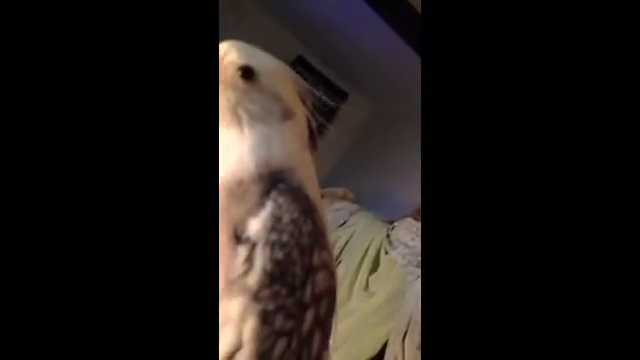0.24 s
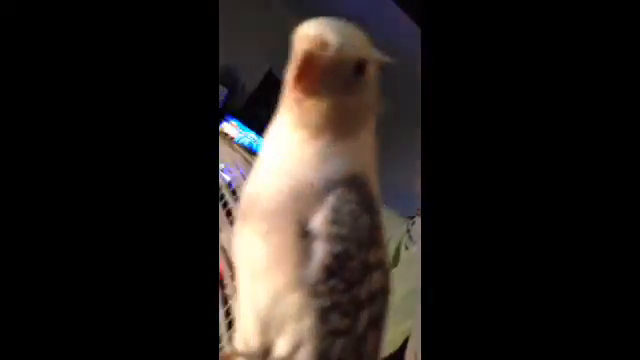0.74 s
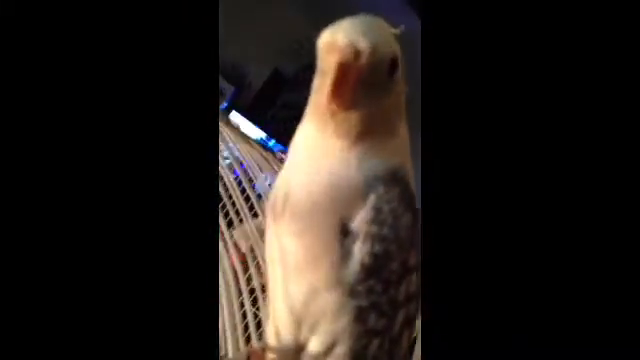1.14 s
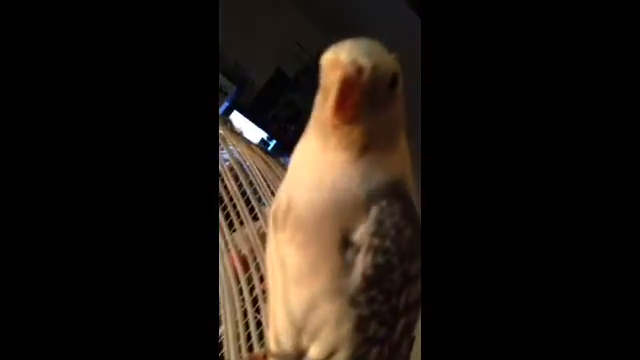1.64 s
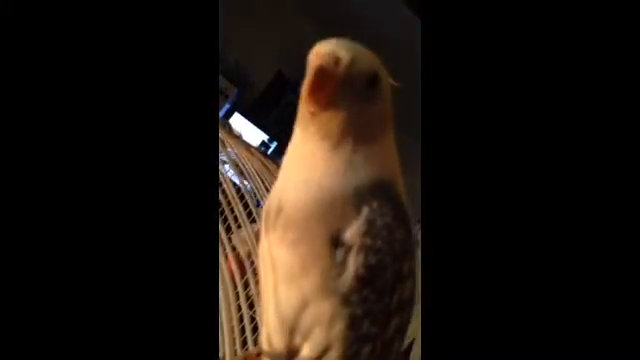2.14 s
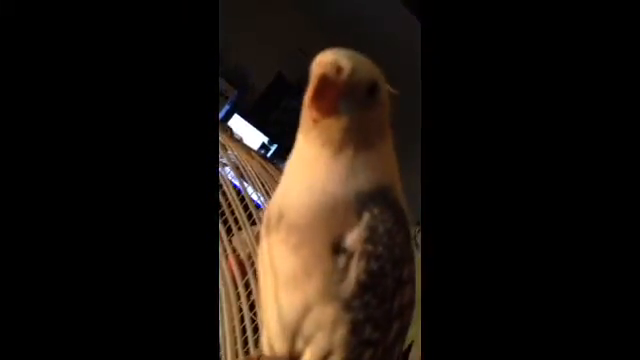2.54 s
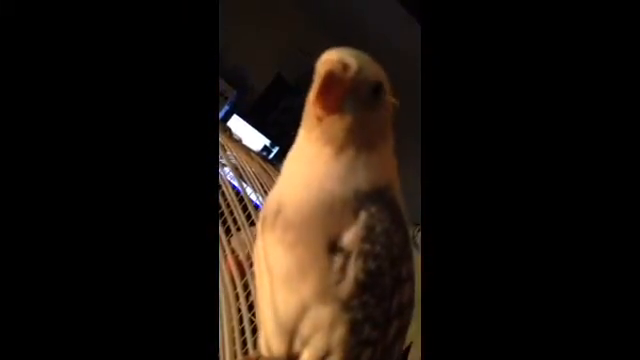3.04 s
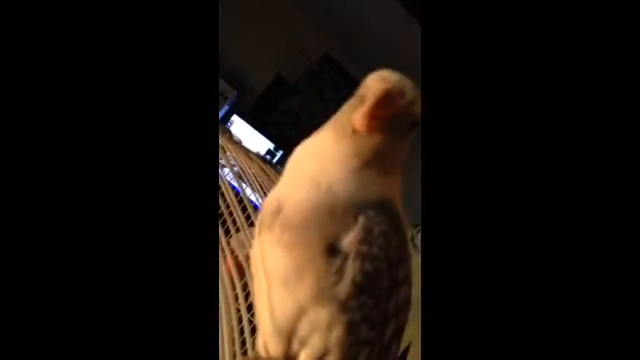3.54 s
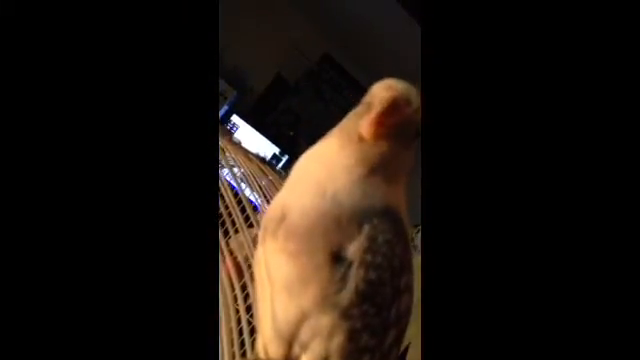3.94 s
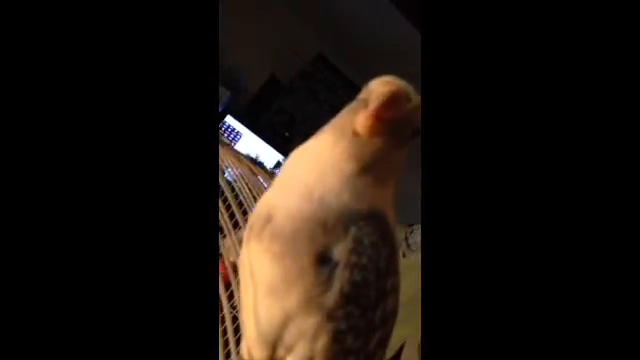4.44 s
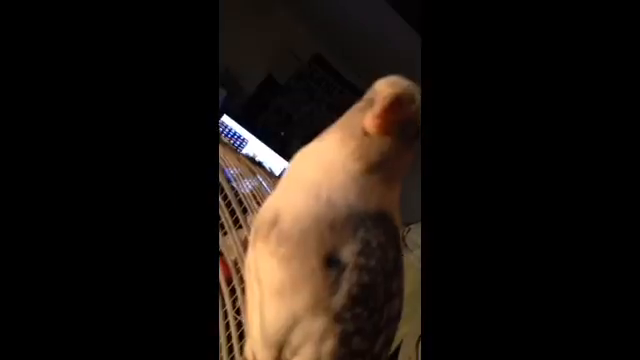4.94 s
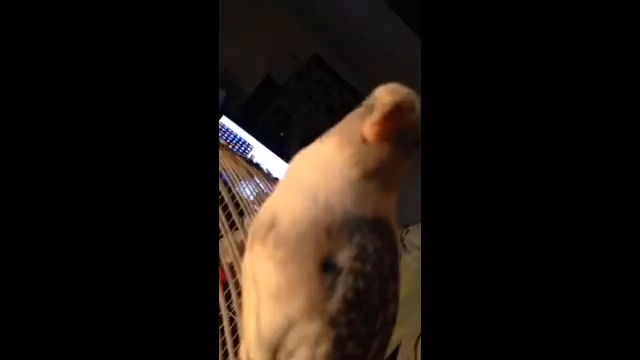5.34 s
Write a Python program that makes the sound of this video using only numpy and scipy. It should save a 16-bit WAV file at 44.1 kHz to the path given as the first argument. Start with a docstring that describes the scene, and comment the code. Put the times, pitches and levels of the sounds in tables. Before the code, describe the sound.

A cockatiel very close to the microphone in a small quiet room. One chirp opens the scene, then about a second of mostly faint, distant chirps. From 1.2 seconds it chatters rapidly, about six short, scratchy-edged chirps a second, until 3.6. After a fainter gap, a held call swells into a shrill quaver, and the chirping resumes to the end.

```python
"""A cockatiel chatters close by in a small quiet room, in bouts of about six chirps a second. Each chirp is a
harmonic series, frequency-modulated by a fast warble that dies away; most open with a falling rasp, a harmonic
series with irregular phase and strength. One call is drawn out to a quaver. Faint chirps, as of a second bird
farther off, reach the ear mostly as reverberation; at the very start the room still rings faintly after an
earlier call, and it rings on briefly after the chirp that ends at 1.45 s. Shaped random noise is the hush of
the room."""
import sys
import numpy as np
from scipy import signal
from scipy.fft import rfft, irfft
from scipy.io import wavfile

SR = 44100
rng = np.random.default_rng(int(sys.argv[2]) if len(sys.argv) > 2 else 0)


def wrap_up_sound(samples):
    """Save the sound to the file named by the first command line argument, as 16-bit audio."""
    columns = np.atleast_2d(samples).T
    # keep every value between -1 and 1, then stretch to whole-number steps
    tamed = np.clip(columns, -1, 1)
    steps = np.round(tamed * 32767).astype(np.int16)
    wavfile.write(sys.argv[1], SR, steps)


N = 245637  # length in samples


def gain_of(db):
    """Decibel law: 20 dB is a factor of ten in amplitude."""
    return 10 ** (np.asarray(db) / 20)


def evened(x):
    """Normalisation: scales to rms 1."""
    return x / np.sqrt(np.mean(x ** 2) + 1e-20)


def read(points, hz):
    """Interpolation of a table on a logarithmic frequency axis."""
    f, value = np.transpose(points)
    return np.interp(np.log(hz + 1), np.log(f + 1), value)


def add(mix, s, sound):
    """Superposition: pressures add, here from time s onwards."""
    part = mix[max(round(s * SR), 0):][:len(sound)]
    part += sound[:len(part)]


def noise(spectrum):
    """Spectral shaping: steady random noise of the given colour, rms 1."""
    white = rfft(rng.standard_normal(N))
    colour = gain_of(read(spectrum, np.fft.rfftfreq(N, 1 / SR)))
    return evened(irfft(white * colour, N))


def flutter(top_hz):
    """Band-limited random motion: little of it is faster than top_hz, rms 1."""
    lowpass = signal.butter(3, top_hz, fs=SR, output="sos")
    return evened(signal.sosfilt(lowpass, rng.standard_normal(N)))


def span(start, end):
    """Sampling: the sample times of one call."""
    first = max(round(start * SR), 0)
    last = min(round(end * SR), N)
    return np.arange(first, last) / SR


def arc(t, *values):
    """Polynomial contour: a line through two values or a parabola through three, evenly spread."""
    knots = np.linspace(0, 1, len(values))
    curve = np.polyfit(knots, values, len(values) - 1)
    return np.polyval(curve, np.linspace(0, 1, len(t)))


def gate(t, attack, release):
    """Onset and decay transients: the syrinx starts and stops within milliseconds."""
    nearest_end = np.minimum((t - t[0]) / attack, (t[-1] - t) / release)
    return np.sin(np.pi / 2 * np.clip(nearest_end, 0, 1)) ** 2


# spectral shape of the quiet room: f/Hz, relative level per Hz/dB
ROOM_HUSH = [(15, -2), (35, -10.5), (60, -2.5), (95, 3), (140, -7), (300, -4.5), (500, -7), (1000, -22.5),
             (2500, -11.5), (5000, -18.5), (9000, -21.5), (15000, -22)]
HUSH_DB = -62.5  # rms level


def hush():
    """Stationary noise: the steady background of the quiet room."""
    return gain_of(HUSH_DB) * noise(ROOM_HUSH)


# reverberation time of the room: f/Hz, t60/s
REVERB_TIME = [(500, 0.21), (1600, 0.51), (3200, 0.21), (6000, 0.2), (14000, 0.11)]


def room(x, treble_db):
    """Reverberation: sparse reflections of random sign; soft furnishings swallow the treble first."""
    count = 1200
    arrival = 150 + 20 * np.arange(count) + rng.integers(0, 20, count)
    taps = np.zeros(SR)
    taps[arrival] = rng.choice([-1., 1.], count)
    hz, t, bands = signal.stft(taps, SR, nperseg=256)
    decay = gain_of(-60 * t / read(REVERB_TIME, hz)[:, None])
    decay = decay * (1 + 3.6 * np.exp(-t / 0.0097))  # nearby things answer first and loudest
    tail = evened(signal.istft(bands * decay, SR, nperseg=256)[1])
    # treble_db is reached at 12 kHz
    tilt = gain_of(read([(1600, 0.016), (12000, treble_db)], np.fft.rfftfreq(len(tail), 1 / SR)))
    response = irfft(rfft(tail) * tilt) / np.sqrt(len(tail))
    return signal.fftconvolve(x, response)[:N]


# colour that throat and beak give the harmonics above the third: f/Hz, relative level/dB
BEAK_OPEN = [(4500, -17), (5800, 19.5), (6700, 19), (7700, 18.5), (8400, 4), (9200, -8), (10200, 5),
             (11200, 6.5), (12300, -14.5), (13500, -7.5), (14600, -28), (15700, 4)]
# the same with the beak nearly shut: f/Hz, relative level/dB
BEAK_SHUT = [(4500, 10.5), (6000, 4), (7500, 5.5), (9000, -10), (10500, 0.5), (12000, 1.5), (13500, 10),
             (14600, -13), (15700, 5)]


def beak_for(treble_db):
    """Vocal-tract filtering: dull calls come through a nearly shut beak."""
    return BEAK_SHUT if treble_db < -21.9 else BEAK_OPEN


THROAT_HZ, THROAT_WIDTH_HZ = 3240, 400  # centre and width of the throat resonance


def throat(hz):
    """Resonance: how near the 2nd harmonic of this pitch lies to the throat resonance, 0-1."""
    return np.exp(-((2 * hz - THROAT_HZ) / THROAT_WIDTH_HZ) ** 2)


# spectral shape of air rushing through the syrinx: f/Hz, relative level per Hz/dB
AIR_RUSH = [(200, -55), (450, -34.5), (750, -57), (1200, -24), (2000, 40), (2900, 28), (3700, -50),
            (4500, 16), (5600, -33), (7500, 6), (9000, -38), (11000, -26), (14500, -18)]


def unrest():
    """Stochastic modulation and turbulence: the chance components of the voice, each of rms 1."""
    drift, jitter = flutter(39.3), flutter(545)  # both act on pitch
    shimmer = flutter(740)  # acts on level
    wander = flutter(287)  # acts on the half-pitch beat
    air = noise(AIR_RUSH)
    hiss = noise([(9000, -47)] + BEAK_SHUT[4:])  # arises at the beak
    return np.array([drift, jitter, shimmer, wander, air, hiss])


SHEEN_HZ = 9200  # treble is the harmonics from the 4th up to here, sheen is those above


def syrinx(t, chance, beak, hz, db, second_db, third_db, treble_db, sheen_db, rough):
    """Harmonic series; roughness adds jitter, shimmer, period doubling and air noise."""
    drift, jitter, shimmer, wander, air, hiss = chance[:, round(t[0] * SR):][:, :len(t)]
    rough = np.clip(rough, 0, 1)
    steady = 2 * np.pi * np.cumsum(hz * (1 + .003 * drift)) / SR
    # vibration at half the pitch puts lines between the harmonics
    beat = np.cos(steady / 2 + 1.1 * rough * wander)
    shaken_hz = hz * .085 * np.tanh(2 * rough) * jitter
    phase = steady + 2 * np.pi * np.cumsum(shaken_hz) / SR + .2 * rough * beat
    second = gain_of(second_db) * np.sin(2 * phase)
    third = gain_of(third_db) * np.cos(3 * phase)
    tone = np.sin(phase) + second + third

    k = np.arange(4, 13)[:, None]  # harmonic number
    colour = gain_of(read(beak, k * hz)) * (k * hz < SR / 2)
    high = np.clip((k * hz - SHEEN_HZ) / 1000 + .5, 0, 1)  # crossfade from treble to sheen
    for share, share_db in ((1 - high, treble_db), (high, sheen_db)):
        group = evened((share * colour * np.sin(k * phase)).sum(0))
        tone = tone + gain_of(share_db) * group / np.sqrt(2)

    doubling = 1 + .6 * rough ** 1.1 * beat  # alternate cycles are unequal
    shake = evened(doubling * gain_of(3.3 * rough * shimmer))
    voiced = np.sqrt(2 - .5 * rough ** 2) * tone + .3 * np.tanh(1.5 * rough) * air
    return gain_of(db) * shake * (voiced + gain_of(sheen_db - 9.5) * hiss)


# one row a faint sound: the first is the fading ring of the room after an earlier call, the row at 1.452 s the
# room still # ringing after the near chirp that ends there, the rest faint chirps: # start t/s, end t/s, pitch
# f/Hz, fall f/Hz (negative rises), relative level/dB, swell/dB, 2nd harmonic relative # level/dB, roughness 0-1
FAINT_SOUNDS = [(0.054, 0.128, 2585, 10, -46.5, -12, -15.5, 0.36),
                (.261, 0.318, 1667, 35, -51.5, 5, -2, 0.09), (0.314, 0.354, 1570, 224, -52, -8, 7, 0.12),
                (0.458, 0.521, 1550, 92, -51.5, 2.5, -11.5, 0.06),
                (0.609, .674, 1557, 336, -54.5, 9, -15, 0.2),
                (0.76, 0.806, 1675, 187, -49.5, -1, -23, 0.17),
                (.811, 0.848, 1513, 200, -59.5, -17, -1.5, 0.18),
                (0.909, 1.002, 1650, 397, -51, 2, -12, 0.24), (1.08, 1.113, 2095, 120, -53, -1, -27, 0.36),
                (1.103, 1.165, 1506, 180, -51, -1, -9, 0.17),
                (1.265, 1.336, 1623, 516, -49.5, 2, -11.5, 0.11),
                (1.452, 1.483, 1553, 90, -50.5, -17, -4.5, 0), (3.034, 3.064, 1627, -65, -51, 1, 4, 0.15),
                (3.204, 3.251, 1610, 135, -52.5, 32, -4, 0), (3.294, 3.353, 1618, 17, -53, -25, 2.5, .05),
                (3.369, 3.414, 1960, 150, -45, 5, -25, 0.05),
                (3.545, 3.596, 2020, 330, -41.5, 8, -26, 0.05),
                (3.725, 3.773, 2052, 341, -45, 28, -22, 0.18),
                (3.829, 3.911, 1624, 140, -45, -6, -10.5, 0.02),
                (4.026, 4.108, 1602, 89, -45, 13.5, 8, 0.04), (4.16, 4.252, 2056, 299, -44.5, 11, -21, 0)]
# 3rd harmonic of a faint chirp, weaker the higher it lies: f/Hz, relative level/dB
FAINT_THIRD = [(4400, -13.5), (4950, -17), (5900, -31), (7800, -38)]


def faint_sound(row, chance):
    """Frequency glide: a soft, dull chirp with weak upper harmonics, mostly falling, or the faint ring the room
    keeps after an earlier call."""
    start, end, pitch, fall, db, swell_db, second_db, rough = row
    t = span(start, end)
    along = arc(t, -0.495, 0.486)
    third_db = read(FAINT_THIRD, 3 * pitch)
    tone = syrinx(t, chance, BEAK_OPEN, pitch - fall * along, db + swell_db * along,
                  second_db, third_db, third_db - 11.5, -45, rough)
    return t[0], tone * gate(t, 0.0029, 0.0049)


# course of the drawn-out call: t/s, pitch f/Hz, relative level/dB,
#   2nd harmonic relative level/dB, higher harmonics relative level/dB
HELD_CALL = [(4.087, 1564, -26, -13, -8), (4.149, 1422, -24.5, -11.5, -14), (4.205, 1390, -31, -16, -30),
             (4.223, 1379, -26, -20.5, -15.5), (4.253, 1486, -22, 4, -9.5), (4.261, 1449, -22.5, 5.5, -0.5),
             (4.323, 1417, -25.5, 10.5, 6), (4.355, 1387, -24, 1.5, -16.5), (4.377, 1293, -26, -46, -19),
             (4.39, 1290, -31, -4, -9)]
# colour of the harmonics above the third, beak wide open: f/Hz, relative level/dB
BEAK_WIDE = [(5800, 9), (7200, 2), (8500, -5.5), (9400, -29.5), (10300, -14), (11400, 2), (12300, -7),
             (13300, -3), (14600, -4.5), (15700, -12)]
QUAVER_HZ, QUAVER_CREST_S, QUAVER_DEPTH_HZ = 30.5, 4.281, 40.4  # rate, time of a crest, peak depth
CLIMAX_S, CLIMAX_HALF_S = 4.305, 0.082  # the quaver comes and goes: middle, half length


def long_call(chance):
    """Slow frequency modulation: a held note swells into a shrill quaver and sinks away."""
    times, *controls = np.transpose(HELD_CALL)
    t = span(times[0], times[-1])
    hz, db, second_db, upper_db = (np.interp(t, times, c) for c in controls)
    depth_hz = QUAVER_DEPTH_HZ * np.exp(-((t - CLIMAX_S) / CLIMAX_HALF_S) ** 2)
    quaver = depth_hz * np.cos(2 * np.pi * QUAVER_HZ * (t - QUAVER_CREST_S))
    # crests are also louder and brighter: dB per Hz of swing
    db = db + 0.036 * quaver
    second_db = second_db + 0.021 * quaver
    upper_db = upper_db + 0.0096 * quaver
    tone = syrinx(t, chance, BEAK_WIDE, hz + quaver, db, second_db,
                  upper_db - 1.0, upper_db - 11.0, -14.5 + 0.79 * upper_db, rough=0.039)
    return t[0], tone * gate(t, 0.0036, 0.0033)


# one row a rasp, most of them leading into a chirp: start t/s, end t/s, pitch f/Hz, relative level/dB,
#   swell/dB, brightness/dB, sheen relative level/dB, roughness (1 is full)
SCRAPES = [(1.174, 1.191, 1910, -32.5, 11, -31, -27, 0.42), (1.353, 1.388, 2056, -34, -1, -36, -28, 0.32),
           (1.517, 1.527, 2076, -27.5, 14, -19, -14, 0.21), (1.638, 1.662, 2550, -28, -2, -21, -21, 0.5),
           (1.808, 1.828, 2320, -30, 2, -29.5, -22, 0.49), (1.971, 1.983, 2534, -29.5, 1, -16, -12, 0.69),
           (2.121, 2.14, 2516, -24.5, 2, -18.5, -43, 0.05), (2.274, 2.292, 2638, -29, 21, -34, -19.5, 1.03),
           (2.432, 2.472, 2577, -29, 5.5, -15.5, -19, 0.55), (2.588, 2.602, 2416, -26.5, 10, -7.5, -36, .9),
           (2.744, 2.783, 2565, -30, 13.5, -19, -21, 0.64),
           (2.905, 2.934, 2507, -30.5, 19, -17.5, -13, .98),
           (3.131, 3.144, 1387, -28.5, -6, -19.5, -20, 0.24), (3.455, 3.464, 1280, -31, 4, -12, -24, 0.34),
           (3.613, 3.631, 1645, -30.5, -2, -15.5, -35, 0.76),
           (3.766, 3.796, 1678, -34.5, -13.5, -15, -39, 0.6),
           (3.944, 3.965, 2697, -37, -30, -44, -32, 0.91), (4.078, 4.09, 1840, -36.5, 8, -23, -25, 0.12),
           (4.39, 4.412, 1566, -42, -17, -47, -26, 0.53), (4.475, 4.547, 1893, -31.5, 2, -47, -35, 0.64),
           (4.629, 4.662, 2258, -22.5, 1.5, -37, -31.5, 0.1),
           (4.773, 4.798, 2218, -27, 5, -36.5, -32, 0.46), (4.94, 4.959, 2362, -33, 14, -28, -19, 0.68),
           (5.1, 5.137, 2020, -30.5, 10, -37, -27, 0.72), (5.31, 5.331, 2074, -30.5, 6, -27.5, -22, 0.45)]
RASP_FALL = 0.336  # share of its pitch that a smooth rasp falls; the roughest stay about level
RASP_ARCH_DB_PER_S = 56  # scale of the level arch, per second of length
RASP_LIFT_DB = 22  # lift of the 2nd harmonic at the throat resonance


def rasp(row, chance):
    """Irregular vibration: a short scrape of the syrinx, falling unless it is very rough."""
    start, end, pitch, db, swell_db, bright_db, sheen_db, rough = row
    t = span(start - .001, end + .002)
    along = arc(t, -0.488, 0.48)
    hz = pitch * (1 - RASP_FALL * (1 - rough ** 4) * along)
    arch_db = RASP_ARCH_DB_PER_S * (end - start) * arc(t, -1.1, 0.64, -1.1)
    level_db = db + swell_db * along + arch_db
    second_db = -5 + 0.56 * bright_db + RASP_LIFT_DB * throat(pitch)
    tone = syrinx(t, chance, beak_for(bright_db - 3), hz, level_db, second_db,
                  bright_db + .5, bright_db - 7, sheen_db, rough)
    return t[0], tone * gate(t, 0.0011, 0.005)


# one row a chirp: start t/s, end t/s, pitch f/Hz at start, middle and end, relative level/dB, swell/dB,
#   brightness/dB, sheen relative level/dB, initial warble depth f/Hz, roughness 0-1
NEAR_CHIRPS = [(0, .053, 1550, 1571, 1380, -22.5, -0.5, -17, -19.5, 44, .05),
               (0.134, .188, 1585, 1330, 1440, -34, 6.5, -22, -26, 70, 0.52),
               (1.185, 1.256, 1452, 1336, 1450, -31.5, -4, -20, -29.5, 44, 0.82),
               (1.385, 1.453, 1547, 1340, 1590, -28, -1, -24, -31, 18, .3),
               (1.529, 1.577, 1780, 1669, 1818, -18.5, 0, -7.5, -19, 74, 0.02),
               (1.655, 1.725, 1686, 1457, 1450, -23.5, -3.5, -10.5, -23, 22, .11),
               (1.824, 1.884, 1675, 1473, 1860, -25, -7, -17.5, -23, 84, 0.02),
               (1.981, 2.037, 1850, 1615, 1566, -19.5, -2.5, -4, -20.5, 125, .02),
               (2.139, 2.208, 1646, 1456, 1570, -23, -2.5, -11.5, -24, 69, 0.04),
               (2.291, 2.363, 1830, 1680, 1587, -19, 4, -13, -22.5, 190, 0.01),
               (2.468, 2.531, 1644, 1570, 1594, -20, 2.5, -13.5, -15.5, 143, 0.03),
               (2.603, 2.668, 1603, 1537, 1350, -22, -3.5, -7, -15, 86, 0.06),
               (2.774, 2.842, 1803, 1662, 1540, -23, 4.5, -25.5, -21, 430, 0.02),
               (2.934, 2.999, 1550, 1526, 1475, -20.5, 0.5, -12.5, -16.5, 184, 0.04),
               (3.068, 3.129, 1611, 1510, 1500, -25.5, 5, -2.5, -10.5, 29, 0.06),
               (3.263, 3.307, 1598, 1405, 1200, -28, -8.5, -5.5, -27, 17, 0.19),
               (3.423, 3.457, 1894, 1573, 1412, -22, -6, -6, -31, 39, 0.06),
               (3.595, 3.616, 2194, 1680, 1690, -22.5, 9, -9.5, -31, 64, 0.18),
               (4.658, 4.693, 1734, 1745, 1490, -23.5, -11, -31, -34, 34, 0.02),
               (4.796, 4.867, 1503, 1503, 1410, -22, 2, -17.5, -25.5, 64, 0.02),
               (4.96, 5.043, 1539, 1523, 1490, -22.5, 2.5, -11, -19, 148, .05),
               (5.136, 5.228, 1477, 1465, 1423, -23.5, -2, -15, -23.5, 102, 0.08),
               (5.329, 5.402, 1558, 1457, 1560, -22, 2.5, -10.5, -17.5, 58, 0.04),
               (5.487, 5.59, 1519, 1522, 1490, -26.5, 1.5, -10, -26, 9.1, .1)]
# how 2nd harmonic, 3rd harmonic and treble (one row each) follow brightness:
#   relative level at 0 dB brightness/dB, slope/(dB per dB)
OVERTONE_LAW = [(0.6, 0.68), (-1, 1), (-9, 1.27)]
WARBLE_HZ, WARBLE_CREST_S, WARBLE_FADE_S = 84.4, 0.0016, 0.042  # rate, first crest, time to die away
ENDS_DB, ENDS_DULL_DB = -1.5, -6  # both ends are softer than the middle, and duller
CHIRP_LIFT_DB = 1  # lift of the 2nd harmonic as it passes the throat resonance
ROUGH_SECOND_DB = 9  # strengthening of the 2nd harmonic at full roughness
# in clean chirps longer than this the 2nd harmonic dips in mid-call; in shorter ones it bulges
HOLLOW_DB, HOLLOW_FROM_S = 4.5, 0.06


def chirp(row, chance):
    """Damped frequency modulation: a fast warble dies away; each crest is louder and brighter."""
    start, end, p0, p1, p2, db, swell_db, bright_db, sheen_db, depth, rough = row
    t = span(start - .001, end + .001)
    age = t - start
    fade = np.exp(-(age / WARBLE_FADE_S) ** 2)
    warble = depth * fade * np.cos(2 * np.pi * WARBLE_HZ * (age - WARBLE_CREST_S))
    push = np.tanh(warble / 90)
    # the pitch drops and breaks as the syrinx lets go
    release = np.exp(-np.maximum(end - t, 0) / 0.001)
    hz = arc(t, p0, p1, p2) * (1 - 0.081 * release) + warble
    level_db = db + swell_db * arc(t, -0.6, .5) + arc(t, ENDS_DB, 0, ENDS_DB) + 1.26 * push

    second_db, third_db, treble_db = (full_db + slope * bright_db for full_db, slope in OVERTONE_LAW)
    # the upper harmonics bloom in mid-call and at the crests
    open_db = arc(t, ENDS_DULL_DB, 0, ENDS_DULL_DB) + 1.3 * push
    # roughest just after the onset, in the troughs of the warble and at the release
    settling = .55 + np.exp(-age / .014) + np.maximum(-push, 0) + 2 * release
    lengthy = np.clip((end - start - HOLLOW_FROM_S) / 0.0094, -1, 1)
    hollow_db = HOLLOW_DB * lengthy * max(1 - 3 * rough, 0)
    second_db = second_db + CHIRP_LIFT_DB * throat(hz) + ROUGH_SECOND_DB * rough
    second_db = second_db + hollow_db * arc(t, 2 / 3, -1 / 3, 2 / 3)
    tone = syrinx(t, chance, beak_for(treble_db), hz, level_db, second_db,
                  third_db + open_db, treble_db + open_db, sheen_db + open_db, rough * settling)
    return t[0], tone * gate(t, 0.0024, 0.0045)


def scene():
    """Direct-to-reverberant ratio: the near bird almost dry, the far one mostly reflected, over hush."""
    near, far, chance = np.zeros(N), np.zeros(N), unrest()
    for row in FAINT_SOUNDS:
        add(far, *faint_sound(row, chance))
    add(near, *long_call(chance))
    for row in SCRAPES:
        add(near, *rasp(row, chance))
    for row in NEAR_CHIRPS:
        add(near, *chirp(row, chance))
    # so small a body radiates little bass
    near = signal.sosfilt(signal.butter(3, 720, "highpass", fs=SR, output="sos"), near)
    far_bird = gain_of(-5) * far + gain_of(-2) * room(far, treble_db=-1)
    near_bird = near + gain_of(-18.5) * room(near, treble_db=7.0)
    return (hush() + far_bird + near_bird)[None]


EDGE_HZ = 15600  # upper band edge


def record(dry):
    """Band limitation: a linear-phase low-pass removes what lies above the band edge."""
    lowpass = signal.firwin(301, EDGE_HZ, window=("kaiser", 8), fs=SR)
    return signal.oaconvolve(dry, lowpass[None], "same")


dry = scene()
out = record(dry)
wrap_up_sound(out)
```